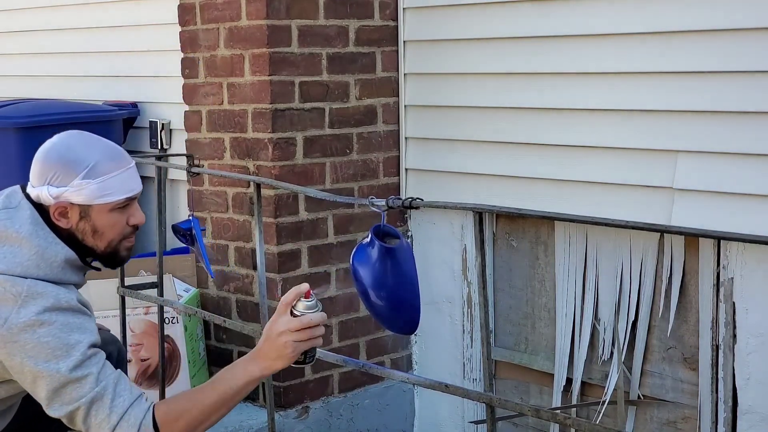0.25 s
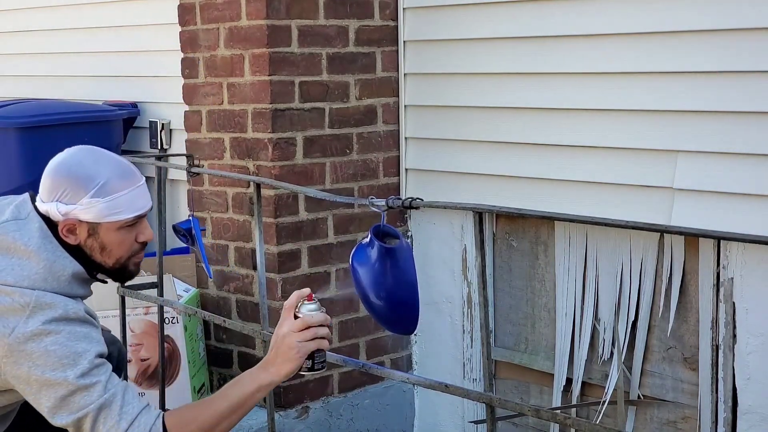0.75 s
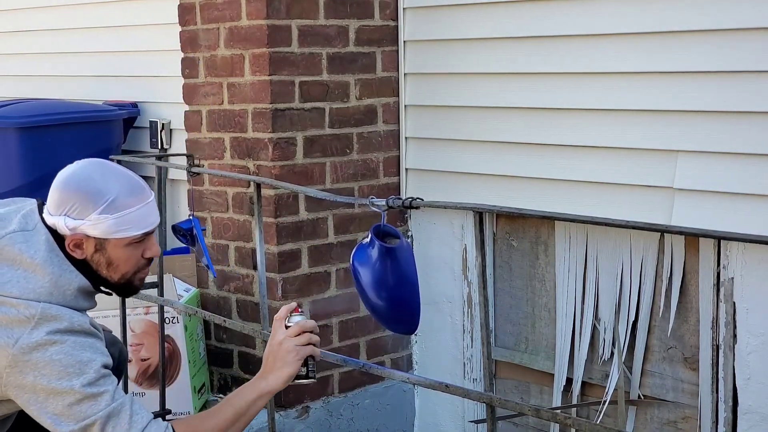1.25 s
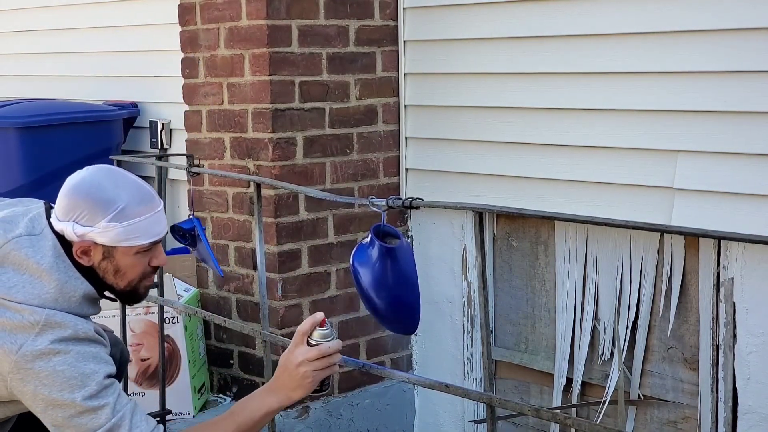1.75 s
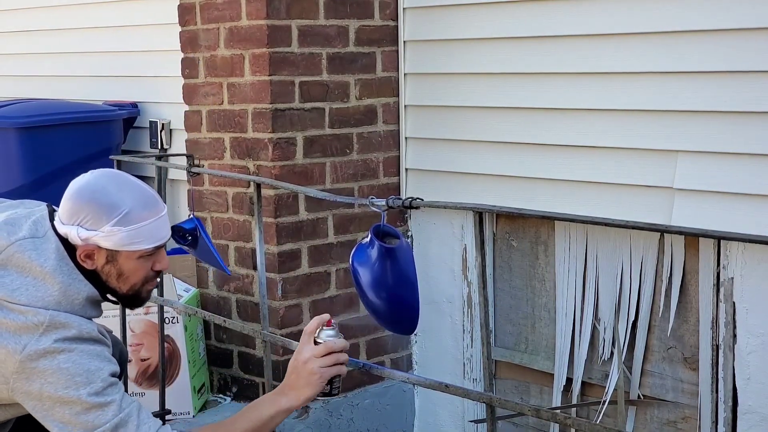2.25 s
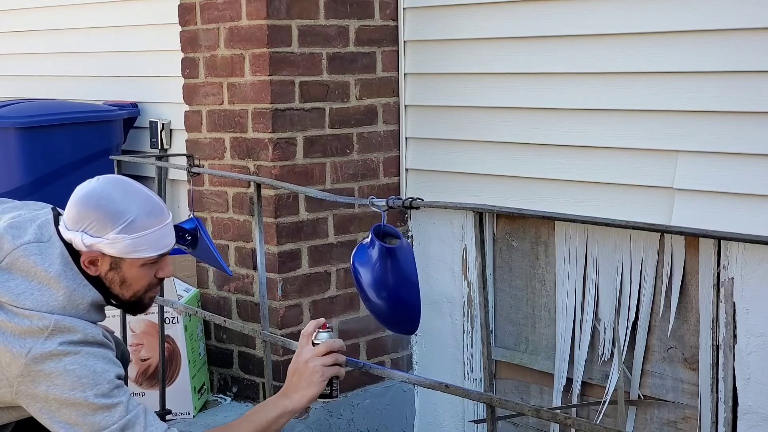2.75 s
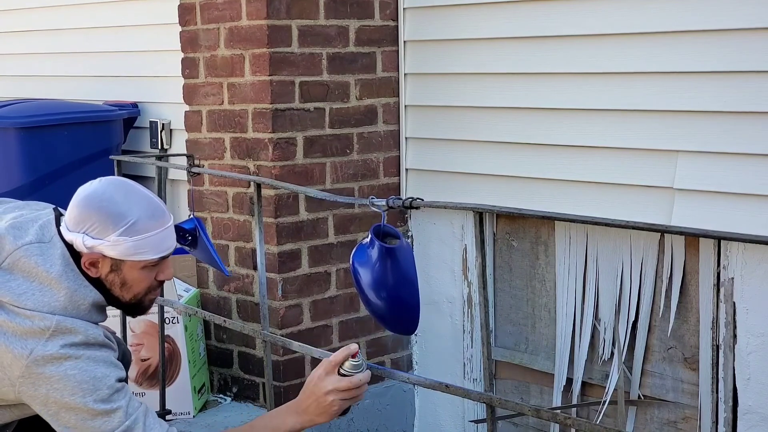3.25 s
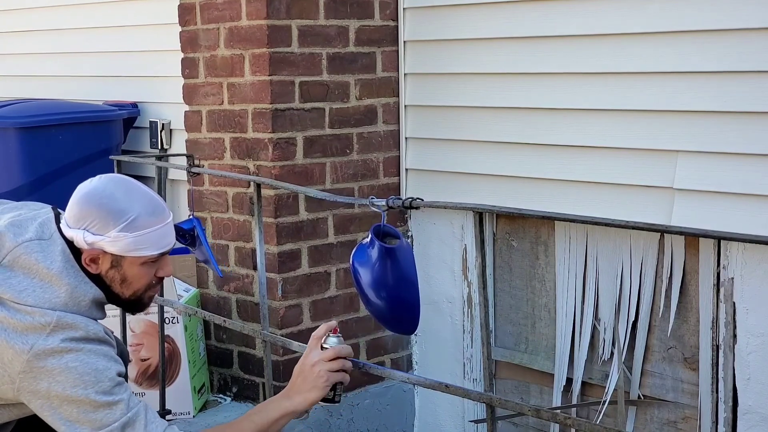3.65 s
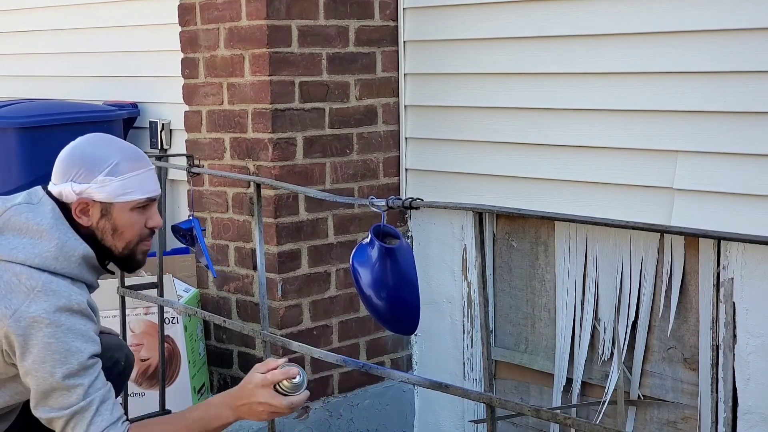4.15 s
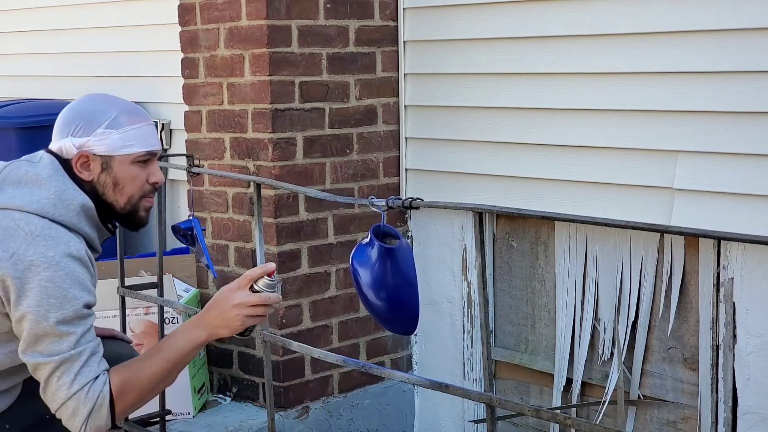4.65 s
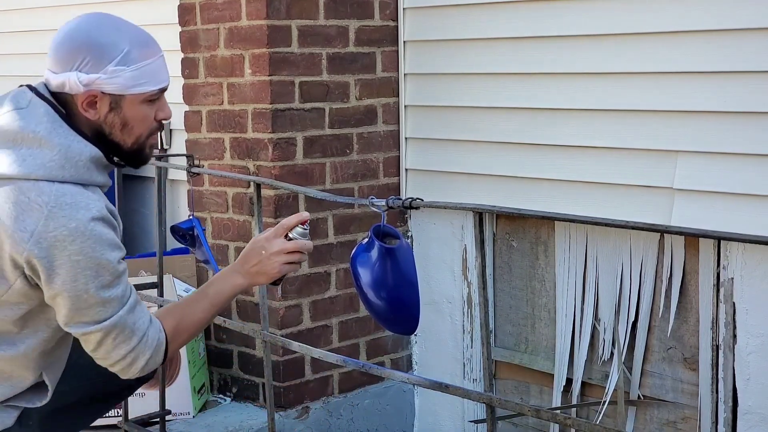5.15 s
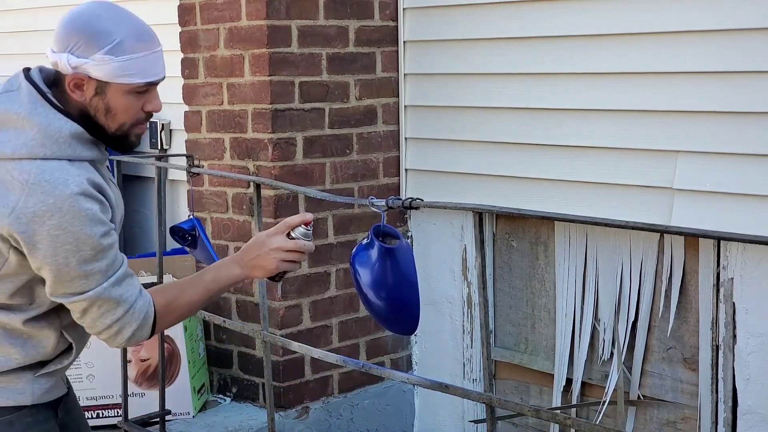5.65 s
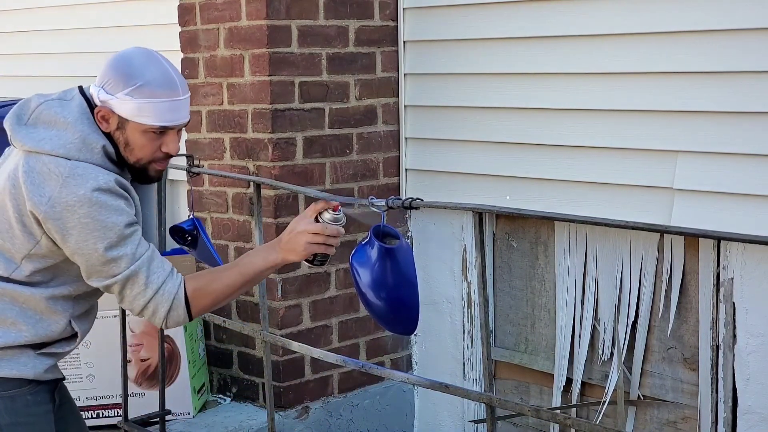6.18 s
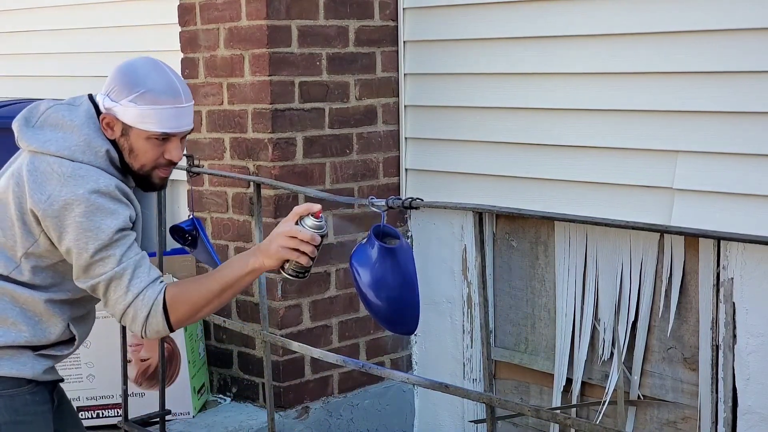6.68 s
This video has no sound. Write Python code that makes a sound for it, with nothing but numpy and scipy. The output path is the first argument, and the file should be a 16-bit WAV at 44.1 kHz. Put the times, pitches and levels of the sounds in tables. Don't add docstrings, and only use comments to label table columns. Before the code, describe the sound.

Close outdoor view of a spray can hissing in quick, regular bursts of about a third of a second, with tiny gaps between them. The mixing ball clicks early. Wind thumps the microphone over a faint town murmur. The spraying stops after four seconds with a small rattle; cloth rustles, shoes scuff and birds chirp until two last bursts.

```python
import sys
import numpy as np
from scipy import signal
from scipy.io import wavfile
from scipy.ndimage import uniform_filter1d

SR = 44100
rng = np.random.default_rng(int(sys.argv[2]) if len(sys.argv) > 2 else 0)


def digitize_waveform(pressure):
    field = np.atleast_2d(pressure).T
    bounded = np.clip(field, -1, 1)
    quanta = np.round(bounded * 32767).astype(np.int16)
    wavfile.write(sys.argv[1], SR, quanta)


def rack_gain(trim_db):
    fader = np.asarray(trim_db, float)
    return 10 ** (fader / 20)


N = 305172


def evened(x):
    return x / np.sqrt(np.mean(abs(x) ** 2) + 1e-20)


def read(points, hz):
    f, value = np.transpose(points)
    return np.interp(np.log(hz + 1), np.log(f + 1), value)


def follow(rows, s, column):
    rows = np.asarray(rows)
    return np.interp(s, rows[:, 0], rows[:, column])


def add(mix, s, sound):
    part = mix[..., round(s * SR):][..., :sound.shape[-1]]
    part += sound[..., :part.shape[-1]]


def sides(lean_db):
    return rack_gain(np.multiply.outer([.5, -.5], lean_db))


def bandpass(order, lo_hz, hi_hz):
    return signal.butter(order, [lo_hz, hi_hz], "band", fs=SR, output="sos")


def in_band(x, lo_hz, hi_hz):
    band = signal.sosfilt(bandpass(4, lo_hz, hi_hz), x.mean(0))
    return x / np.sqrt(np.mean(band ** 2))


def flutter(width_s):
    count = max(int(width_s * SR), 1)
    once = uniform_filter1d(rng.standard_normal(N), count)
    return evened(uniform_filter1d(once, count))


def steadied(x, window_s):
    count = int(window_s * SR)
    power = uniform_filter1d(uniform_filter1d(x ** 2, count), count)
    return x / np.sqrt(abs(power) + 0.038 * power.mean())


def bumps(heights, at, half_s):
    coarse = np.arange(0, N + 128, 128) / SR
    bells = np.exp(-.5 * ((coarse - np.asarray(at)[:, None]) / half_s) ** 2)
    summed = np.atleast_2d(heights) @ bells
    return lambda t: np.squeeze([np.interp(t, coarse, row) for row in summed])


def noise(colour_db, same, size, patch_db, patch_hz, patch_s, lag_ms=0.):
    hop = size // 4
    hz = np.fft.rfftfreq(size, 1 / SR)
    s = np.arange(N // hop + 5) * hop / SR
    a, b, c, d, p, q = rng.standard_normal((len(s), len(hz), 6)).T
    patches = uniform_filter1d(np.array([p, p + q]), max(int(patch_hz * size / SR), 1), 1)
    patches = uniform_filter1d(patches, max(int(patch_s * SR / hop), 1), 2)
    patches /= patches.std(axis=(1, 2), keepdims=True)
    same = np.clip(read(same, hz), -1, 1)[:, None]
    late = np.exp(-2j * np.pi * hz * lag_ms / 1000)[:, None]
    left, other = a + 1j * b, c + 1j * d
    z = np.array([left, same * late * left + np.sqrt(1 - same ** 2) * other])
    z *= rack_gain(colour_db(hz[:, None], s) + patch_db * np.clip(patches, -3, 1.8))
    return signal.istft(z, nperseg=size, noverlap=size - hop)[1][:, :N]


def whistle(rows, wobble=0.0029, throb_db=0.):
    s, hz, db = np.transpose(rows)
    t = np.arange(s[0], s[-1], 1 / SR)
    waver, throb = evened(uniform_filter1d(rng.standard_normal((len(t), 2)), 350, 0)).T
    pitch_hz = np.interp(t, s, hz) * (1 + wobble * waver)
    tone = np.sin(2 * np.pi * np.cumsum(pitch_hz) / SR)
    level = rack_gain(np.interp(t, s, db) + throb_db * throb)
    return s[0], np.sqrt(2) * level * tone * signal.windows.tukey(len(t), .1)


def yard(x, t60, first_s):
    t = np.arange(SR // 2) / SR
    signs = rng.choice([-1., 1.], (2, len(t)))
    hits = rng.random((2, len(t))) < .04
    taps = signs * hits * rack_gain(-60 * t / t60) * (t > first_s)
    return signal.fftconvolve(np.atleast_2d(x), taps / np.linalg.norm(taps[0]), axes=1)[:, :N]


# t/s, level/dB
MURMUR_CURVE = [(0.0, -56.5), (1.27, -59.5), (1.79, -59.5), (4.87, -52), (5.43, -53.5), (6.11, -47.5),
                (6.3, -49.5), (6.55, -46.5), (6.82, -52.5), (6.92, -46)]
# f/Hz, density/dB per Hz
TOWN_SPECTRUM = [(24, -29), (40, 0.5), (72, -2), (266, -11.5), (367, -15), (493, -17), (807, -17.5),
                 (1010, -22), (1780, -19.5), (2700, -33), (3290, -47), (4000, -38.5), (9020, -54),
                 (11800, -44), (14400, -49)]
# f/Hz, likeness/1
TOWN_LIKENESS = [(60, 0.91), (300, .85), (600, 0.7), (1000, 0.33), (3000, 0.097), (6000, 0.2), (14000, .1)]
# t/s, f/Hz, level/dB
ENGINE_DRONE = [(0.0, 135, -47.5), (0.3, 136.4, -49.5), (0.85, 135.8, -55), (1.0, 141, -45)]


def town():
    def colour(hz, s):
        swell = follow(MURMUR_CURVE, s, column=1)
        share = 0.036 + 1.08 / (1 + (350 / (hz + 1)) ** 3) / (1 + (hz / 2500) ** 3)
        return read(TOWN_SPECTRUM, hz) + share * (swell - swell.mean())
    wash = noise(colour, TOWN_LIKENESS, size=1024, patch_db=2.5, patch_hz=150, patch_s=.08, lag_ms=-0.31)
    drone = np.zeros(N)
    add(drone, *whistle(ENGINE_DRONE, wobble=0.0066))
    return in_band(wash, 306, 1250) * rack_gain(-53.5) * sides(-0.16)[:, None] + drone * sides(-1)[:, None]


# peak t/s, f/Hz, level/dB, half
# length/s
LOW_THROBS = [(1.001, 105.6, -35.5, 0.042), (1.164, 170, -33.5, 0.0059), (1.36, 160, -39.5, .04),
              (1.49, 110.5, -32, 0.049), (5.62, 139.6, -49.5, .04), (3.398, 79.4, -42, 0.049),
              (4.709, 81.8, -50, .08), (4.915, 77.6, -43.5, 0.069), (5.821, 89.7, -44, .07),
              (6.203, 79.7, -36.5, .05), (6.751, 85.5, -44.5, 0.19)]


def rumble():
    out = np.zeros(N)
    for s, hz, db, half in LOW_THROBS:
        swell = [(s - 2 * half, hz, db - 13.0), (s, hz, db), (s + 2 * half, hz, db - 8.5)]
        add(out, *whistle(swell, wobble=0.088, throb_db=2.5))
    return out


# t/s, level/dB, left-right/dB
GUST_CURVE = [(0.0, -48, -7), (.3, -46.5, 0), (.65, -35.5, 10.5), (.8, -45, -9), (1.05, -25.5, 8),
              (1.15, -38.5, -2), (1.39, -41, -4), (1.47, -27.5, -5), (1.63, -32, 4.5), (1.8, -40, -3.5),
              (2.2, -45.5, -9.5), (2.6, -45.5, -3), (2.85, -48, -14), (3.2, -32.5, 2), (3.3, -46.5, -4),
              (4.1, -58, 2), (5.5, -60, -5), (6.92, -55.5, 2)]
# f/Hz, density/dB per Hz
THUMP_SPECTRUM = [(8.8, -58), (15, -54), (43, 7.5), (130, -12.5), (170, -76), (290, -120)]
# f/Hz, density/dB per Hz
BUFFET_SPECTRUM = [(70, -18), (110, 7.5), (160, -1), (260, -20), (500, -29), (900, -55)]
# t/s, level/dB, left-right/dB
PORT_EDDIES = [(.17, -45, -10), (.295, -32.5, 0), (.46, -37, 6), (0.902, -25.5, 6.5), (1.46, -35, 11),
               (1.96, -33.5, -4), (2.2, -46.5, -13), (2.45, -49, -8), (2.56, -41, -17), (2.66, -43.5, -20),
               (2.76, -42, -8), (3.0, -39.5, -12), (3.41, -49, -19), (3.65, -54, 6), (3.8, -43, 0),
               (3.91, -42, 6), (4.2, -45, -9), (4.3, -46, -16), (4.63, -45.5, -9), (4.91, -47.5, -19),
               (5.85, -54, -7), (6.21, -43, 12), (6.73, -46, -3)]
EDDY_S = 0.027
BUFFET_DB, BUFFET_SLOPE, STRONG_DB = -37.5, 1.68, -30.5
PORT_LIMIT = .24


def wind():
    t = np.arange(N) / SR
    apart = [(20, -.25), (90, -.2), (300, .2)]  # f/Hz, likeness/1
    thump = noise(lambda hz, s: read(THUMP_SPECTRUM, hz) + 0 * s, apart,
                  size=4096, patch_db=2.5, patch_hz=30, patch_s=.1)
    buffet = noise(lambda hz, s: read(BUFFET_SPECTRUM, hz) + 0 * s, apart,
                   size=2048, patch_db=3.0, patch_hz=60, patch_s=.05)
    lumps = np.array([flutter(0.038), flutter(0.026)])
    thump = in_band(steadied(thump, 0.05) * rack_gain(1.6 * lumps), 15.5, 103)
    buffet = in_band(steadied(buffet, .04) * rack_gain(3.5 * lumps), 105, 260)
    strength_db = follow(GUST_CURVE, t, column=1)
    ports = sides(follow(GUST_CURVE, t, column=2))
    at, db, lean = np.transpose(PORT_EDDIES)
    eddies = bumps(rack_gain(db) * sides(lean), at, EDDY_S)(t)
    buffet_db = BUFFET_DB + BUFFET_SLOPE * (strength_db - STRONG_DB)
    buffet = buffet * rack_gain(buffet_db) * sides(-2.1)[:, None]
    pressure = thump * np.hypot(rack_gain(strength_db - 1.5) * ports, eddies) + buffet * ports
    return PORT_LIMIT * np.tanh(pressure / PORT_LIMIT)


# t/s, f/Hz, level/dB
FIRST_GLIDE = [(3.56, 2900, -66), (3.7, 2690, -49), (3.76, 2500, -54), (3.82, 2390, -45), (3.88, 2280, -57),
               (4.0, 2130, -55), (4.14, 2020, -59)]
# t/s, f/Hz, level/dB
SECOND_GLIDE = [(4.306, 3430, -54), (4.38, 3110, -55.5), (4.441, 2885, -44), (4.481, 2867, -49.5),
                (4.52, 2668, -42), (4.58, 2560, -50.5), (4.629, 2373, -43.5), (4.679, 2196, -56),
                (4.76, 2170, -53)]
# t after start/s, f/Hz, level/dB
CHIRP_NOTES = [
    [(-.006, 2700, -16), (.003, 2950, -3), (.015, 2980, 4), (.026, 2650, 2), (.034, 2330, 5),
     (.044, 2150, -4)],
    [(.044, 2800, -9), (.056, 2950, -1), (.07, 2450, -8), (.082, 2150, 2), (.097, 2050, -5)],
]
CHIRP_FIRST_S, CHIRP_EVERY_S, CHIRP_COUNT = 4.867, .1876, 9
CHIRP_DB, CHIRP_ARCH_DB, CHIRP_VARY = -48.5, 1.5, .012
# t/s, length/s, start f/Hz, end f/Hz, level/dB
FAR_PEEPS = [(1.845, .06, 3780, 3800, -52), (4.23, .05, 3800, 3800, -64), (4.345, .045, 4150, 4130, -64),
             (4.35, .06, 3750, 3800, -66), (4.41, .11, 3830, 3900, -60), (4.55, .06, 3850, 3750, -66),
             (4.9, .07, 3800, 3900, -66), (4.948, .045, 4140, 4120, -65), (5.065, .05, 4140, 4120, -66),
             (5.17, .055, 4140, 4120, -64), (5.225, .12, 3800, 3850, -60), (5.67, .04, 3950, 3850, -62),
             (5.74, .04, 3850, 3800, -67), (5.9, .035, 4140, 4120, -62), (5.95, .17, 3900, 3780, -63)]


def birds():
    near, far = np.zeros(N), np.zeros(N)
    for rows in (FIRST_GLIDE, SECOND_GLIDE):
        add(near, *whistle(rows, wobble=.004, throb_db=3.5))
    for k in range(CHIRP_COUNT):
        s = CHIRP_FIRST_S + k * CHIRP_EVERY_S
        db = CHIRP_DB + CHIRP_ARCH_DB * np.sin(np.pi * k / (CHIRP_COUNT - 1))
        for note in CHIRP_NOTES:
            pitch_ratio = 1 + CHIRP_VARY * rng.standard_normal()
            varied = np.multiply(note, [1, pitch_ratio, 1]) + [0, 0, rng.normal(0, 0.98)]
            add(near, *whistle(varied + [s, 0, db], wobble=0.008, throb_db=3.))
    for s, length, hz0, hz1, db in FAR_PEEPS:
        glide = [(s, hz0, db), (s + 1.2 * length, hz1, db)]
        add(far, *whistle(glide, wobble=.005 if hz0 > 4000 else .02, throb_db=3.))
    near_sound = rack_gain(-4.5) * near * sides(-4.4)[:, None] + rack_gain(-4.5) * yard(near, 0.4, 0.0091)
    far_sound = rack_gain(-8) * far + rack_gain(-9) * yard(far, .12, .004)
    return near_sound + far_sound


# f/Hz, density/dB per Hz
CLOTH_SPECTRUM = [(1530, -8.5), (2600, -2), (3560, -8.5), (3770, -4), (6320, -9.5), (9170, -12),
                  (12700, -10), (14400, -13)]
# peak t/s, level/dB, rise/s, fall/s
SLEEVE_RUBS = [
    (4.25, -59.5, 0.076, 0.057),
    (4.56, -62, 0.24, 0.11),
    (4.67, -64, 0.082, 0.057),
    (4.78, -69, .07, 0.11),
    (4.887, -61.5, 0.012, 0.15),
    (5.353, -49, 0.073, 0.083),
    (5.6, -61, 0.045, 0.099),
    (5.7, -65.5, 0.027, 0.17),
    (6.09, -61, 0.25, 0.41),
]
RUB_DEPTH_DB = 21.5
SEEP_DB, SEEP_FALL_DB_PER_S, STILL_DB = -62, 140, -81


def rustle():
    t = np.arange(0, N + 64, 64) / SR
    cloth = noise(lambda hz, s: read(CLOTH_SPECTRUM, hz) + 0 * s, [(1000, 0.22), (15000, 0.037)],
                  size=256, patch_db=4.5, patch_hz=900, patch_s=.03)
    power = rack_gain(2 * STILL_DB)
    for stroke in NOZZLE_STROKES:
        power = power + rack_gain(2 * (SEEP_DB - SEEP_FALL_DB_PER_S * abs(t - stroke[1])))
    for s, db, rise, fall in SLEEVE_RUBS:
        away = np.maximum((s - t) / rise, (t - s) / fall)
        power = power + rack_gain(2 * (db - RUB_DEPTH_DB * away))
    level = np.interp(np.arange(N) / SR, t, np.sqrt(power))
    crackle_db = 1.9 * flutter(0.0029)
    return in_band(cloth, 5500, 13500) * level * rack_gain(crackle_db) * sides(-3.5)[:, None]


# t/s, length/s, centre f/Hz, level/dB
SCUFF_EVENTS = [(1.043, 0.035, 2250, -43.5), (1.01, .06, 3600, -43.5), (1.372, 0.073, 1900, -48.5),
                (0.249, .04, 3300, -42.5), (2.569, 0.14, 1780, -51), (3.31, 0.084, 1950, -45.5),
                (4.059, 0.11, 1610, -49), (4.508, 0.075, 1830, -47), (4.539, .06, 1460, -50),
                (5.01, 0.074, 1850, -56), (5.189, 0.072, 1800, -51), (5.305, .075, 1930, -43.5),
                (5.575, 0.033, 1860, -45.5), (5.565, 0.025, 1400, -52), (5.94, 0.054, 1850, -53),
                (6.131, .04, 1380, -54), (6.498, 0.086, 740, -47.5)]


def scrapes():
    out = np.zeros((2, N))
    for s, length, hz, db in SCUFF_EVENTS:
        count = int(length * SR)
        grains = rng.standard_normal((2, count)) + rng.standard_normal(count)
        scuff = evened(signal.sosfilt(bandpass(2, hz * 0.9, hz * 1.12), grains))
        add(out, s, rack_gain(db) * scuff * np.hanning(count))
    return out


def rung(modes, times):
    t, aged = times
    ring = 0
    for hz, db, t60 in modes:
        ring = ring + rack_gain(db + rng.normal(0, 2.46) - 60 * aged / t60) * np.sin(2 * np.pi * hz * t)
    return ring * (1 - np.exp(-t / 0.00015))


# t/s, peak level/dB, left-right/dB, dull part re peak/dB
BALL_KNOCKS = [
    (.3656, -38, -3, 3),
    (.3667, -33, -3, -2),
    (.4062, -28, -2, -2),
    (.4326, -29, -6, -7),
    (.6024, -33, 2, -5),
    (1.8911, -43, -6, -12),
    (4.190, -30, -6, -14),
    (4.2213, -35, -8, -14),
    (4.2344, -41, -6, -10),
    (4.2466, -39, -7, -12),
]
# f/Hz, level/dB, t60/s
CAN_MODES = [(2850, -11, .04), (3700, 2, .014), (3830, -8, .07), (4150, -4, .009), (4800, -11, .02),
             (8000, -14, .012)]
# f/Hz, level/dB, t60/s
PALM_MODES = [(1503, -15, 0.12), (2000, -2.5, 0.033), (2150, -3.5, 0.054), (2450, 1.5, 0.013)]
GRIP, CRACK_DB, CRACK_S = 3, 0, .012
# t/s, peak level/dB, left-right/dB
DRY_TICKS = [
    (.3665, -41, -3),
    (.717, -50, -3),
    (4.190, -43, -5),
    (4.8848, -46, -6),
    (5.5747, -54, -3),
    (5.3152, -48, -4),
    (5.3351, -41, -4),
    (5.5882, -37, -6),
    (5.9844, -55, -5),
]


def rattle():
    out, t = np.zeros((2, N)), np.arange(3000) / SR
    broad = bandpass(2, 1100, 5000)
    for s, db, lean, dull_db in BALL_KNOCKS:
        crack = evened(signal.sosfilt(broad, rng.standard_normal(len(t)))) * rack_gain(CRACK_DB - 60 * t / CRACK_S)
        steel = rung(CAN_MODES, t * [[1], [1 + GRIP * rack_gain(dull_db)]])
        blow = steel + rack_gain(dull_db) * (rung(PALM_MODES, np.array([t, t])) + crack)
        add(out, s, rack_gain(db - 3.5) * np.outer(sides(lean), blow))
        add(out, s + 0.001292, rack_gain(db - 14) * np.outer(sides(lean), blow))
    thin = bandpass(1, 4300, 13500)
    cut = signal.butter(2, 4400, "high", fs=SR, output="sos")
    for s, db, lean in DRY_TICKS:
        bright = signal.sosfilt(thin, signal.sosfilt(cut, rng.standard_normal((2, len(t)))))
        puff = evened(bright) * rack_gain(-60 * t / 0.011)
        add(out, s, rack_gain(db) * sides(lean)[:, None] * puff)
    return out + rack_gain(-19) * yard(out, 0.1, 0.0038)


# open t/s, shut t/s, jet level/dB, sag over stroke/dB, low hiss re jet/dB
NOZZLE_STROKES = [(-.02, 0.308, -45.5, -2, -1.5), (0.369, 0.731, -46.5, -1, -0.5),
                  (0.773, 1.098, -45.5, -2.5, -3), (1.137, 1.481, -46, -3, -4),
                  (1.531, 1.875, -45.5, 7, -3), (1.916, 2.281, -44.5, 0, -6.5),
                  (2.334, 2.667, -45, 3.5, -3), (2.7, 3.005, -44.5, -3, -5.5), (3.056, 3.379, -45.5, 3, -3),
                  (3.414, 3.789, -45.5, 1, -2.5), (3.852, 4.154, -44, 1.5, -5), (6.262, 6.709, -46.5, 0, 1),
                  (6.769, 7.0, -47, 1, -2)]
OPEN_S, OPEN_DB, SHUT_S, SHUT_DB = 0.036, -3.5, 0.039, -26
POP_DB, POP_S = 6.5, 0.012
# t/s, boost/dB
FAN_SPURTS = [(.135, 4.5), (.27, 4.5), (.585, 5), (.672, 6), (.81, 5.5), (0.908, 7.5), (1.05, 4), (1.25, 3),
              (1.61, 6), (1.82, -3.5), (2.05, 4), (2.381, 6), (2.94, 3.5), (4.03, -4.5), (4.11, 4),
              (6.4, 1), (6.53, 3.5), (6.9, 5)]
SPURT_S, SPURT_LOW = 0.022, 0.16
AIM_DB, SWING_DB = -6, 3


def nozzle(t):
    start, end, db, sag_db, low_db = np.transpose(NOZZLE_STROKES)
    k = np.maximum(np.searchsorted(start, t, "right") - 1, 0)
    since, left = t - start[k], end[k] - t
    phase = np.clip(since / (end - start)[k], 0, 1)
    at, boost_db = np.transpose(FAN_SPURTS)
    spurt = bumps(boost_db, at, SPURT_S)(t)
    edges = OPEN_DB * np.clip(1 - since / OPEN_S, 0, 1) + SHUT_DB * np.clip(1 - left / SHUT_S, 0, 1)
    level = db[k] + sag_db[k] * (phase - .5) + spurt + edges
    low = low_db[k] - (1 - SPURT_LOW) * spurt + POP_DB * np.exp(-abs(since) / POP_S)
    lean = AIM_DB + SWING_DB * np.sin(np.pi * phase)
    return left > 0, level, low, lean


# f/Hz, density/dB per Hz
JET_SPECTRUM = [(710, -12), (1200, -22.5), (1740, -11), (2000, -2), (2290, -10.5), (2590, -4.5), (3540, -1),
                (5710, -3), (6470, -7.5), (7400, -2), (9110, -10), (10500, -9.5), (12100, -2), (13400, -4),
                (14400, -5.5)]
# f/Hz, likeness/1
JET_LIKENESS = [(1500, 0.71), (2500, 0.79), (4000, 0.54), (5000, 0.43), (6300, 0.44), (9000, 0.1),
                (12800, 0.65), (14400, 0.33)]
# f/Hz, left-right/dB
JET_BALANCE = [(1500, 0), (3000, -2.5), (6000, -2.5), (9000, -1.5), (11500, -9.5), (14400, -11)]


def spray():
    def colour(hz, s):
        low = nozzle(s)[2]
        share = 1 / (1 + (hz / 4700) ** 6)
        return read(JET_SPECTRUM, hz) + share * (low + 2.9) + sides(read(JET_BALANCE, hz))
    is_open, level_db, _, lean = nozzle(np.arange(N) / SR)
    jet = noise(colour, JET_LIKENESS, size=2048, patch_db=4.4, patch_hz=90, patch_s=.08, lag_ms=0.015)
    sputter_db = 0.78 * flutter(0.018) + 0.21 * flutter(0.001)
    level = rack_gain(sputter_db) * uniform_filter1d(rack_gain(level_db) * is_open, size=200)
    near = in_band(jet, 4730, 14730) * level * sides(lean + 1.8)
    dull = signal.sosfilt(signal.butter(3, 4800, fs=SR, output="sos"), near)
    return near + rack_gain(-9) * yard(dull, 0.52, 0.0037)


def scene():
    background = town() + rumble() + wind() + birds()
    return background + rustle() + scrapes() + rattle() + spray()


def roll_off(x):
    return signal.sosfilt(signal.butter(12, 15390, fs=SR, output="sos"), x)


def record(dry):
    edge = signal.firwin(1501, 14500, window=("kaiser", 8), fs=SR)
    mix = signal.oaconvolve(dry, edge[None], "same")
    return roll_off(mix)


dry = scene()
out = record(dry)
digitize_waveform(out)
```